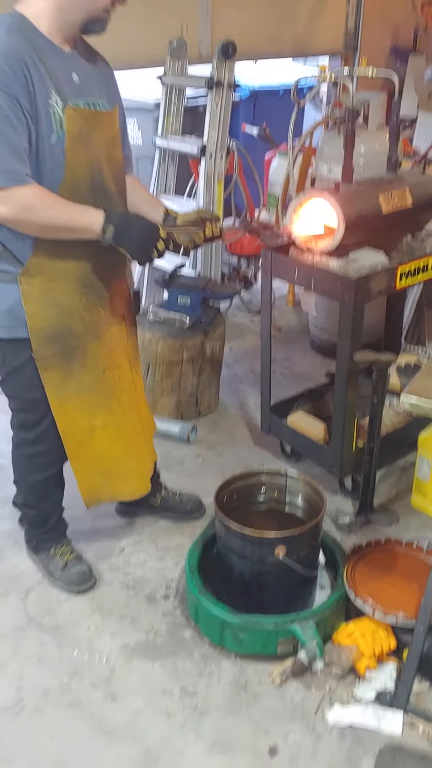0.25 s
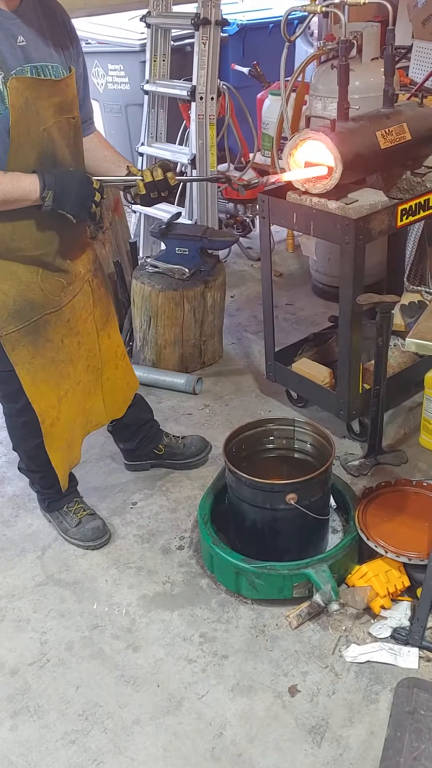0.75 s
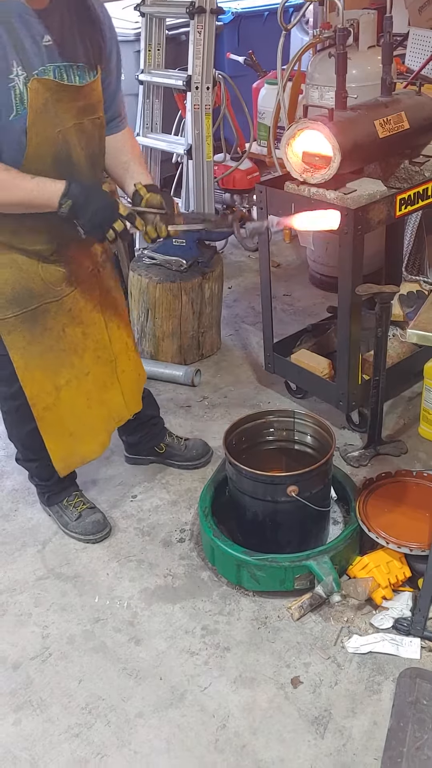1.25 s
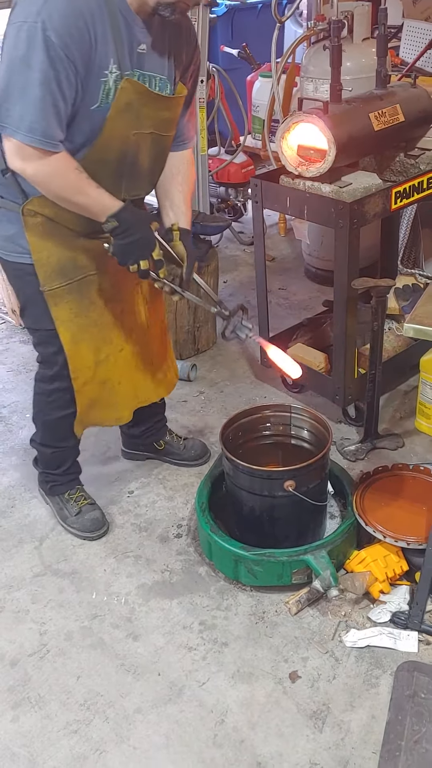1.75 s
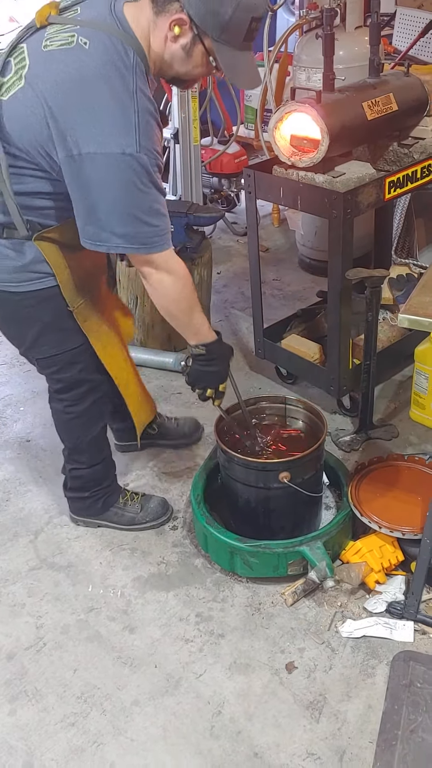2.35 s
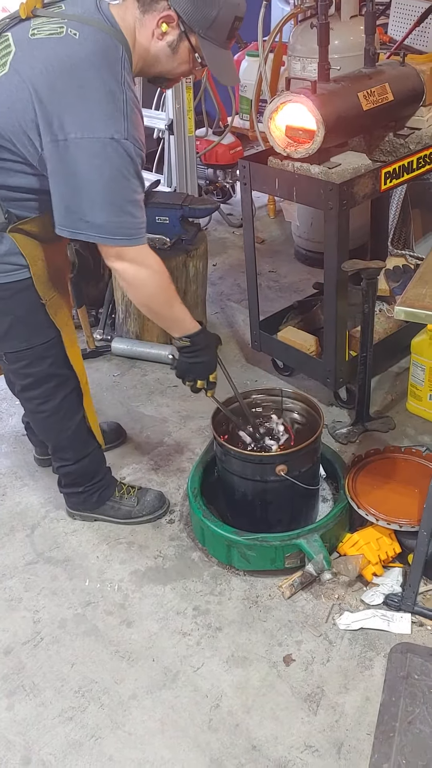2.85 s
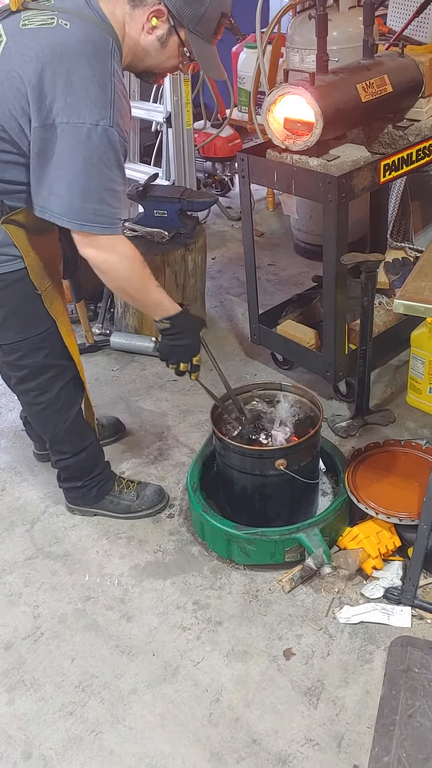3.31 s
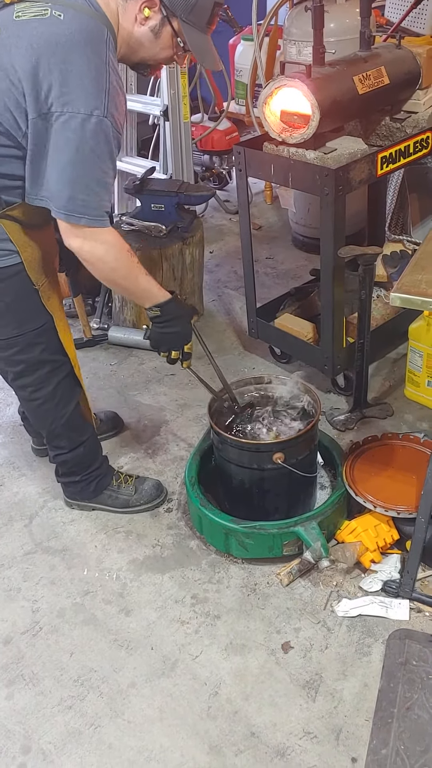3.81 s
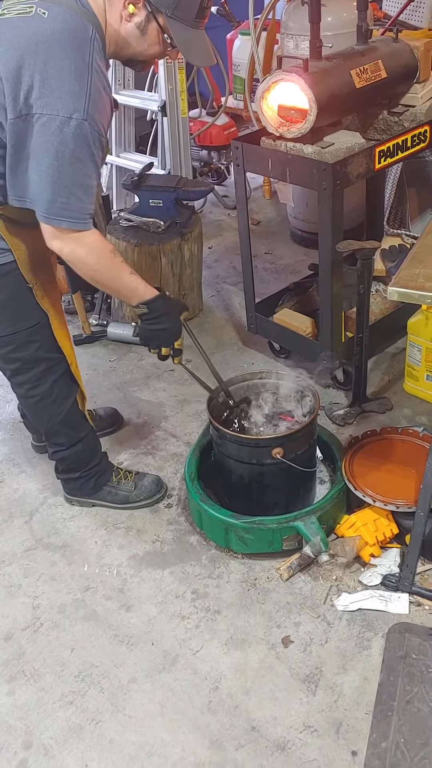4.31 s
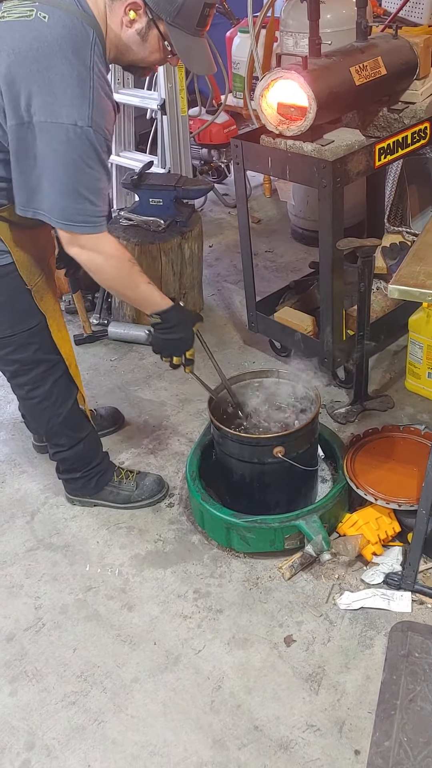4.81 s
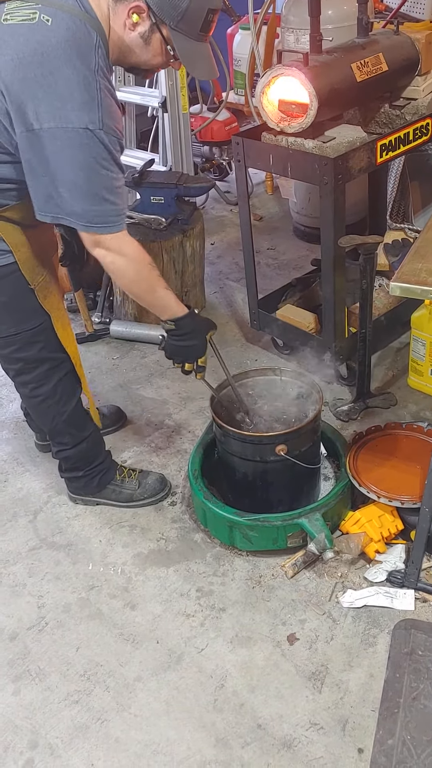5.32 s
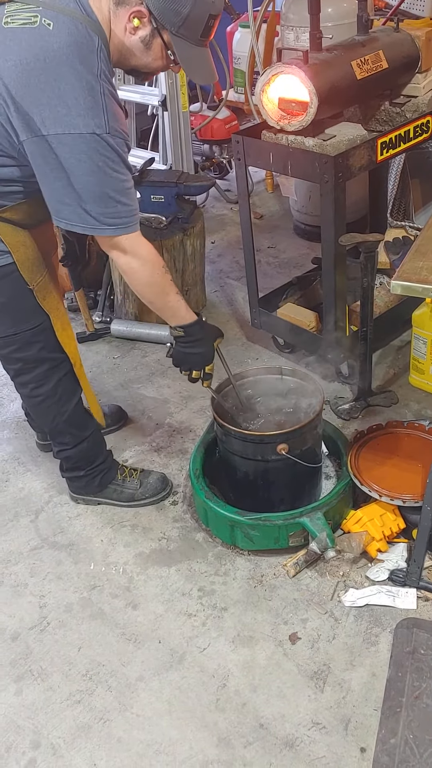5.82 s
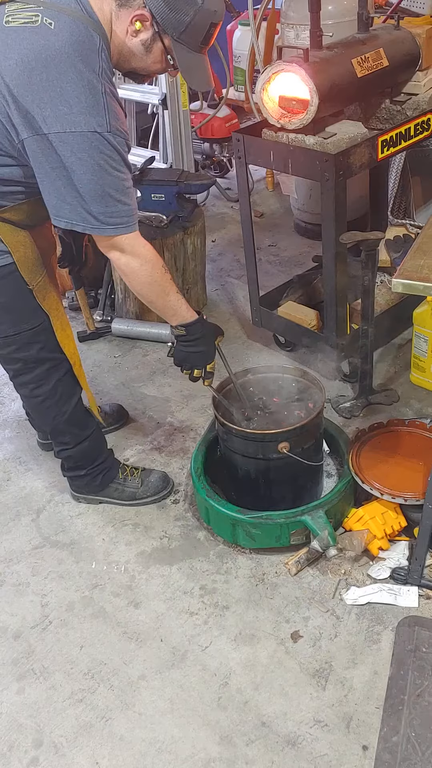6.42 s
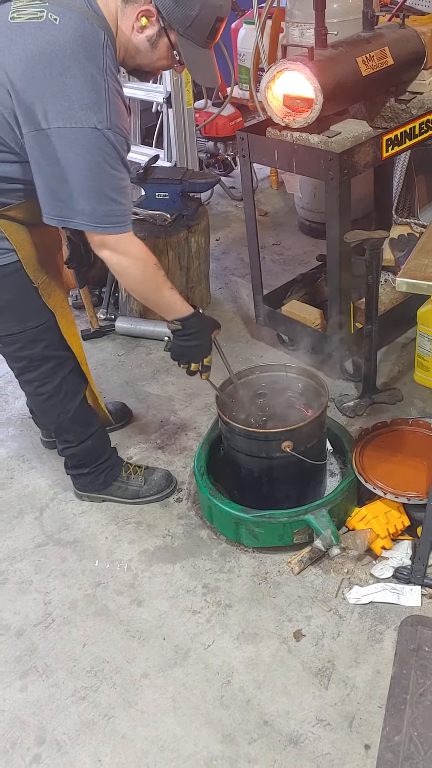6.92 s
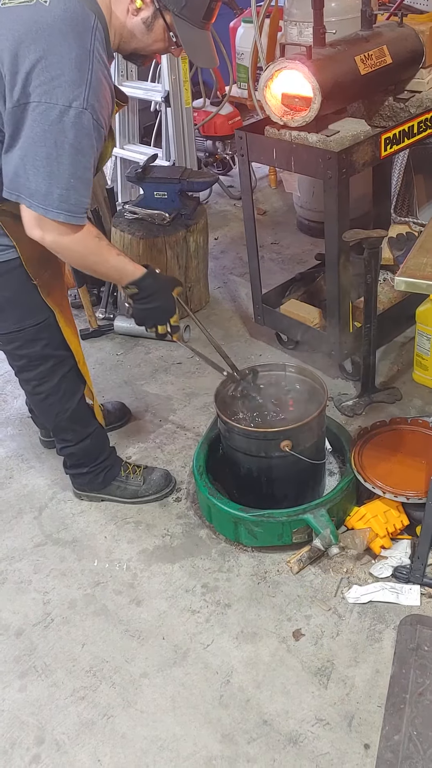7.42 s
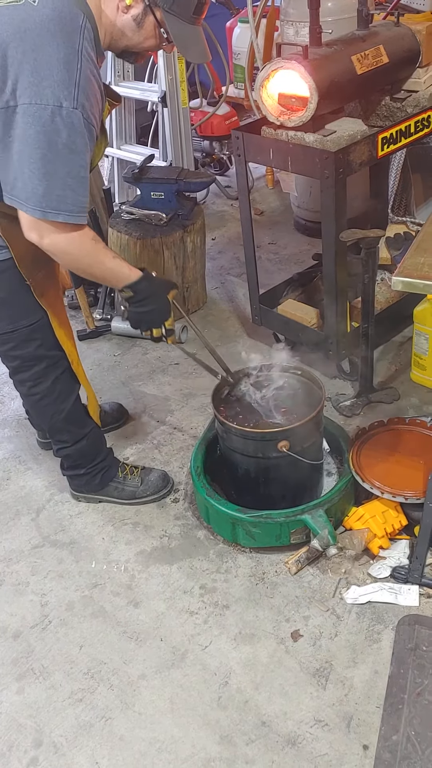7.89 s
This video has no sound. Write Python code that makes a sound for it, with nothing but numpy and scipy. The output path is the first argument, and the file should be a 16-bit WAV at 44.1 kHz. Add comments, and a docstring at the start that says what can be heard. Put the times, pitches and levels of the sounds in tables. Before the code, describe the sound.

Steady burner roar with loud, evenly spaced hammer blows weakening early on, followed by a brief oil quench sizzle, small metallic taps and a dull bump.

```python
"""Propane forge, hammer and oil quench

A propane forge burns steadily in a garage: a low roar, flow noise ringing in tube and room, under the jet's hiss.
Six sharp blows, like a hammer out of sight, are noise cracks with a hollow knock, a floor echo and a room tail.
A smith carries a hot blade from the forge to a bucket of oil: the oil splutters, spits and sizzles as noise bursts,
the tongs tap the rim and the blade bumps the wall, each a click with decaying modes.
A look-ahead limiter ducks the forge after each loud crack and lets it swell back."""
import sys
import numpy as np
from scipy import signal
from scipy.fft import rfft, irfft, next_fast_len
from scipy.io import wavfile
from scipy.ndimage import uniform_filter1d, minimum_filter1d

SR = 44100
rng = np.random.default_rng(int(sys.argv[2]) if len(sys.argv) > 2 else 0)


def generate_wav(sig):
    """Save sig (samples, or channels by samples) to the path in sys.argv[1] as 16-bit PCM at SR."""
    pcm = np.round(np.clip(np.atleast_2d(sig).T, -1, 1) * 32767).astype(np.int16)
    wavfile.write(sys.argv[1], SR, pcm)


N = 359415  # samples


def amp(db):
    """Level to amplitude: 20 dB is a factor of ten."""
    return 10 ** (np.asarray(db) / 20)


def unit(x):
    """Normalisation: scales a signal to rms 1."""
    return x / np.sqrt(np.mean(x ** 2) + 1e-20)


def read(points, hz):
    """Logarithmic frequency scale: joins (f/Hz, value) points by straight lines on it."""
    f, value = np.transpose(points)
    return np.interp(np.log(hz + 1), np.log(f + 1), value)


def follow(curve):
    """Envelope: joins (t/s, value) points into one value per sample."""
    return np.interp(np.arange(N) / SR, *np.transpose(curve))


def wander(count, size):
    """Low-passed chance: noise averaged over size samples, scaled to rms 1."""
    return unit(uniform_filter1d(rng.standard_normal(count), size=size))


def waver(depth_db, size):
    """Random amplitude modulation: a gain that wanders by depth_db rms."""
    return amp(depth_db * wander(N, size))


def swells(table):
    """Gaussian envelopes: a gain that rises and falls back around each (t/s, rise/dB, sigma/s)."""
    t = np.arange(N) / SR
    return amp(sum(db * np.exp(-((t - s) / sigma) ** 2 / 2) for s, db, sigma in table))


def sides(balance_db):
    """Level difference between the ears: left and right gains of constant total power."""
    pair = amp(np.array([balance_db, -balance_db]) / 2).reshape(2, -1)
    return pair / np.sqrt(np.mean(pair ** 2, 0))


def add(mix, s, sound):
    """Superposition: mixes a stereo sound in at time s."""
    part = mix[:, round(s * SR):][:, :sound.shape[1]]
    part += sound[:, :part.shape[1]]


def patchy(x, depth_db, size):
    """Time-frequency modulation: patches of size (bins, frames) swell and fade by chance."""
    z = signal.stft(x, nperseg=256)[2]
    patches = uniform_filter1d(rng.standard_normal(z.shape[1:]), size[0], axis=0)
    patches = unit(uniform_filter1d(patches, size[1], axis=1))
    return unit(signal.istft(z * amp(depth_db * patches))[1][:, :x.shape[1]])


def grainy(x, depth_db, size):
    """Granular modulation: breaks a noise into uneven grains about size samples long."""
    return unit(x * amp(depth_db * wander(x.shape[1], size)))


def steadied(x, size):
    """Envelope division: takes the slow swell out of a noise."""
    return x / np.sqrt(uniform_filter1d(np.mean(x ** 2, 0), size))


def drifting(x, share, size):
    """Sound speed in stirring hot gas: all resonances wander together by an rms share of their pitch."""
    speed = 1 + share * wander(N, size)
    place = np.cumsum(speed / speed.mean())
    return np.array([np.interp(place, np.arange(N), channel) for channel in x])


# likeness of the two microphones: f/Hz, likeness (negative values act as 0)
MICROPHONE_LIKENESS = [(60, 1), (290, 0.93), (450, 0.7), (700, 0.77), (1400, 0.13), (7000, 0.26),
                       (15000, -0.36)]
# broadband stereo balance: f/Hz, left minus right level/dB
FLOW_BALANCE = [(60, 2.5), (380, -13), (700, 13), (1200, -6.5), (2400, 0.5), (4400, -4.5), (8000, -8),
                (15000, -1)]


def turbulence(spectrum, modes, ripple_db, lag_s=.00018):
    """Turbulent flow noise: a broad spectrum with resonances, partly coherent at two microphones."""
    hz = np.fft.rfftfreq(next_fast_len(N, True), 1 / SR)
    power = (amp(read(spectrum, hz)) * sides(read(FLOW_BALANCE, hz))) ** 2
    for centre, width, db, balance_db in modes:
        resonance = amp(db) * sides(balance_db) / (1 + ((hz - centre) / width) ** 2)
        power = power + resonance ** 2
    # wall reflections comb each microphone differently
    comb = unit(uniform_filter1d(rng.standard_normal((2, len(hz))), size=200, axis=1))
    left, other = rng.standard_normal((2, len(hz))) + 1j * rng.standard_normal((2, len(hz)))
    same = np.clip(read(MICROPHONE_LIKENESS, hz), 0, 1)
    right = same * left + np.sqrt(1 - same ** 2) * other
    right = right * np.exp(-2j * np.pi * hz * lag_s)  # arrives later by lag_s
    return unit(irfft(np.array([left, right]) * np.sqrt(power) * amp(ripple_db * comb))[:, :N])


# impact tables below share these columns: t/s, crack level/dB, crack sigma/s, brightness/(dB per octave),
# knock f/Hz, knock level/dB over the crack spectrum, room level/dB; some add clang f/Hz, clang level/dB
# spectrum of a hard impact: f/Hz, level/dB
CRACK_SPECTRUM = [(150, -36), (600, -35), (1500, -13), (3700, -3), (5500, -1.5), (6600, -1.5), (7500, 1.5),
                  (8100, -2), (8800, -8), (10000, -13.5), (11500, -15), (12400, -23), (16000, -31)]
# spectrum of the hollow knock: multiple of its pitch, level/dB
KNOCK_SPECTRUM = [(.12, -43), (.3, -2), (.52, 2.5), (.8, 2.5), (1, 7), (1.22, 2), (1.42, -9), (2.2, -33),
                  (5, -50)]
# decay of the garage: f/Hz, t60/s
GARAGE_DECAY = [(300, 0.076), (2500, 0.33), (7000, 0.26), (12000, 0.19)]
# colouring of the reflected sound by the walls: f/Hz, level/dB
WALL_COLOUR = [(500, 4), (3000, -4.5), (11500, 3), (12800, -4), (16000, -15)]


def impact(db, length, tilt_db, knock_hz, knock_db, room_db, clang_hz=5000, clang_db=0, echo_db=-10):
    """Impulse excitation: a short crack with knock and clang, its floor bounce, and the ring of the garage."""
    size, echo_s, build_s, clang_width_hz = 2 ** 15, 0.0058, 0.01, 400
    t, hz = np.arange(size) / SR, np.fft.rfftfreq(size, 1 / SR)
    knock_shape_db = read(np.multiply(KNOCK_SPECTRUM, [knock_hz, 1]), hz)
    knock = amp(knock_db + read(CRACK_SPECTRUM, knock_hz) + knock_shape_db)
    clang = amp(clang_db / (1 + ((hz - clang_hz) / clang_width_hz) ** 2))
    colour = np.hypot(amp(read(CRACK_SPECTRUM, hz)), knock) * clang
    colour = colour * amp(tilt_db * np.log2(hz + 1000))
    burst, wash = (unit(irfft(colour * rfft(rng.standard_normal((2, size))))) for _ in range(2))

    burst = burst + 0.27 * burst[::-1]  # the direct sound is partly alike at both microphones
    onset = np.minimum(t * knock_hz * 2, 1)  # a deeper knock starts more softly
    shape = np.exp(-(t / length) ** 2 / 2) * onset
    crack = unit(burst * shape) * np.sqrt(np.mean(shape ** 2))
    echo = amp(echo_db) * np.roll(crack, round(echo_s * SR), axis=1)

    # reflections arrive singly and in clumps
    wash = grainy(patchy(wash, depth_db=1.2, size=(5, 6)), depth_db=1.0, size=36)
    f, when, z = signal.stft(wash, SR, nperseg=256)
    fade_db = read(WALL_COLOUR, f)[:, None] - 60 * when / read(GARAGE_DECAY, f)[:, None]
    tail = signal.istft(z * amp(fade_db), SR)[1][:, :size]
    tail = tail * (1 - np.exp(-(t / build_s) ** 2))
    return amp(db) * sides(balance_db=-2.5) * (crack + echo + amp(room_db) * tail)


def impacts(table):
    """Superposition of impulses: plays every row of a table of impacts."""
    out = np.zeros((2, N))
    for s, *row in table:
        add(out, s, impact(*row))
    return out


def ring(modes, spacing_s=.0001):
    """Modal decay of a struck body; each mode reaches each microphone with its own small random lead."""
    t = np.arange(SR // 4) / SR
    tones = np.zeros((2, len(t)))
    for hz, db, t60 in modes:
        shifted = t + spacing_s * rng.random((2, 1))
        tones += amp(db - 60 * t / t60) * np.sin(2 * np.pi * hz * shifted)
    return tones * np.minimum(t / .0003, 1)  # soft start


# slow drift of the roar: t/s, level/dB
ROAR_DRIFT = [(0, -17.5), (0.55, -14.5), (1.15, -14), (1.7, -15), (2.68, -17), (2.88, -16), (3.3, -17.0),
              (4.4, -17.0), (4.85, -19.0), (5.55, -17.0), (6.1, -19.5), (6.6, -16.5), (6.95, -19.5),
              (7.45, -17.0), (8.15, -18)]
# brief low surges: t/s, rise/dB, sigma/s; the one at 6.81 s is the bucket booming as the tongs knock it
LOW_SURGES = [(1.313, 1, 0.0055), (2.262, 5, 0.021), (6.81, 9, 0.011)]
# smooth spectrum of the roar: f/Hz, relative level/dB
ROAR_SPECTRUM = [(20, -88), (40, -78), (70, -61.5), (100, -56), (140, -52), (200, -49.5), (235, -78),
                 (300, -54), (410, -58), (480, -59.5), (540, -81), (800, -110)]
# resonances of forge tube and room: f/Hz, half-width/Hz, relative peak level/dB, left minus right level/dB
ROAR_RESONANCES = [(59, 5.8, -56.5, -7), (94.7, 7.4, -51.5, 0), (112, 10, -75, 9), (155.2, 13.7, -48.5, 8),
                   (189, 17.3, -47, -4), (207.7, 4.3, -40, 6.5), (266.5, 7.2, -34.5, -3.5),
                   (276, 27, -41.5, 0), (303, 19.7, -41, -1.5), (339, 18, -43.5, -3), (347, 18, -49.5, -34),
                   (393.6, 15.1, -34.5, -3.5), (423.8, 6.7, -43.5, -2), (464, 7.6, -50.5, 3)]


def flame():
    """Combustion noise in a resonant tube: a steady roar with a slow drift, lifted by a few brief low surges,
    one of them a boom of the bucket."""
    roar = turbulence(ROAR_SPECTRUM, ROAR_RESONANCES, ripple_db=0.0, lag_s=.00003)
    roar = drifting(steadied(roar, size=11000), share=0.00886, size=6000)
    return roar * amp(follow(ROAR_DRIFT)) * swells(LOW_SURGES)


# moments when one forge resonance stands out: t/s, sigma/s, f/Hz, half-width/Hz, level/dB
RESONANCE_FLARES = [(0.48, 0.037, 1030, 21, -28.5), (1.24, 0.082, 970, 99, -35),
                    (2.97, 0.02, 1010, 49, -29), (4.25, 0.041, 51.3, 9, -34)]


def flares():
    """Resonant excitation: the flame drives one mode harder, a short fuzzy whistle or a low puff."""
    t, hz = np.arange(N) / SR, np.fft.rfftfreq(next_fast_len(N, True), 1 / SR)
    out = np.zeros((1, N))
    for s, sigma, centre, width, db in RESONANCE_FLARES:
        random_phase = np.exp(2j * np.pi * rng.random((1, len(hz))))
        band = irfft(random_phase / (1 + ((hz - centre) / width) ** 4))[:, :N]
        out += amp(db) * steadied(band, size=4000) * np.exp(-((t - s) / sigma) ** 2 / 2)
    return sides(balance_db=-3.0) * out


# the smith's move, which changes the reflections: t/s, share of the way from forge mouth to bucket
SMITH_WALK = [(.6, 0.43), (1.8, 0.74), (3.2, 0.9), (5.5, 1)]
# smooth spectra of the rush and of the hiss: f/Hz, relative level/dB
RUSH_SPECTRUM = [(350, -106), (500, -63.5), (660, -62.5), (1000, -68.5), (1250, -63.5), (1430, -74),
                 (1620, -65), (1830, -66.5), (2150, -74), (3000, -105)]
HISS_SPECTRUM = [(1500, -100), (2300, -70.5), (3050, -70), (3400, -73.5), (4400, -71.5), (5600, -72),
                 (6700, -60.5), (7200, -64), (7650, -59.5), (8200, -62), (8700, -70.5), (11400, -78.5),
                 (13000, -84), (15500, -99)]
# resonances of the rush with the smith at the bucket, of the rush with him at the forge, and of the hiss:
# f/Hz, half-width/Hz, relative peak level/dB, left minus right level/dB
RUSH_AT_BUCKET = [(509, 16, -61, 6), (580.4, 19.6, -52.5, 5), (615, 15, -66, 5), (717, 5, -51.5, -5),
                  (774, 8, -50, 6), (831, 15.3, -54.5, 0), (856, 43, -58.5, -4), (921.5, 18, -51.5, -10),
                  (981, 29, -53, -28), (1020, 4.5, -51, 1), (1047, 15.5, -56, 0), (1130, 7.4, -60, 13)]
RUSH_AT_FORGE = [(735, 16, -69, 11), (844, 14, -55, -16), (867, 21, -51.5, -9), (980, 90, -56, -1.5),
                 (1132, 52, -57, -26), (1360, 35, -63, -4), (1615, 54, -59, -20), (1780, 4, -65, -25)]
HISS_RESONANCES = [(2900, 12, -79, 1), (3063, 33, -65, -18), (3190, 33, -68, -10), (6126, 36, -60.5, -24),
                   (6770, 36, -58, -40), (7410, 27, -60, 18)]
# brief swells of the hiss, mostly just ahead of a blow: t/s, rise/dB, sigma/s
BRIEF_HISS_SWELLS = [(0.025, 4.5, 0.038), (0.145, 5.5, 0.02), (0.757, 4.5, 0.018), (1.305, 5, 0.031),
                     (1.892, 8, 0.03), (2.455, 3.5, 0.015), (2.968, 4.5, 0.015), (7.07, 2, 0.063)]


def jet(bucket_db=-29.0, forge_db=-25.5, hiss_db=-30, hiss_forge_rise_db=3.9, flutter_db=0.76):
    """Jet noise: rush at the forge mouth and hiss flutter together and change as the smith moves."""
    way = np.clip(follow(SMITH_WALK), 0, 1)
    # equal-power crossfade between the two sets of resonances
    rush = np.sqrt(way) * turbulence(RUSH_SPECTRUM, RUSH_AT_BUCKET, ripple_db=2.5) * amp(bucket_db)
    rush += np.sqrt(1 - way) * turbulence(RUSH_SPECTRUM, RUSH_AT_FORGE, ripple_db=5.0) * amp(forge_db)
    rush = drifting(rush, share=0.00815, size=5000)
    hiss = turbulence(HISS_SPECTRUM, HISS_RESONANCES, ripple_db=3.0)
    hiss = patchy(hiss, depth_db=1.56, size=(4, 22))
    hiss = hiss * amp(hiss_db + hiss_forge_rise_db * (1 - way))
    hiss = hiss * swells(BRIEF_HISS_SWELLS) * waver(depth_db=0.2, size=6000)
    return waver(flutter_db, size=1300) * (rush + hiss)


def sizzle(start_s=2.05, per_s=14, pop_db=-33):
    """Poisson-like bubble bursts on the oil, one pop at random times and strengths, once the blade is in."""
    pops = (rng.random(N) < per_s / SR) * rng.uniform(0.32, 2.4, N)  # pop_db is before this factor
    pops = pops * (np.arange(N) / SR > start_s)
    pop = impact(pop_db, length=0.0009, tilt_db=9, knock_hz=3060, knock_db=-5, room_db=-2.5)
    return signal.oaconvolve(pops[None], pop, axes=1)[:, :N]


# spectrum of the splutter at its peak: f/Hz, relative level/dB
SPLUTTER_SPECTRUM = [(400, -20), (800, 0), (1600, -1), (2600, -5), (3900, -11), (5500, -4), (6400, -11),
                     (7500, 0), (9500, -15), (14000, -31)]


def splutter(peak_s=2.595, db=-18, rise_s=0.12, fall_s=0.041, darkening=39):
    """Vapour breaking through oil: a grainy hiss darkens by dB per octave per second, swells and dies."""
    hz, when, z = signal.stft(rng.standard_normal((2, N)), SR, nperseg=256)
    since = np.clip(when - peak_s, -rise_s, fall_s)
    tilt_db = darkening * since * np.log2(hz + 1000)[:, None]
    colour = amp(read(SPLUTTER_SPECTRUM, hz)[:, None] - tilt_db)
    hiss = signal.istft(z * colour / np.linalg.norm(colour, axis=0))[1][:, :N]
    t = np.arange(N) / SR - peak_s
    swell = np.exp(-np.where(t < 0, (t / rise_s) ** 2, t / fall_s))
    return amp(db) * sides(balance_db=-3.0) * swell * grainy(hiss, depth_db=1.2, size=110)


# spits of oil: impact columns without the clang
OIL_SPITS = [(2.049, -20, 0.0022, 1, 7550, 7, -14), (2.0955, -21.5, 0.001, 2, 7550, 7, -18),
             (2.2359, -19, 0.001, 1, 7400, 9, -18), (2.3676, -18, 0.001, 2, 7550, 9, -18),
             (3.4731, -16, 0.00058, 6, 7000, 7, -9), (4.0283, -20, 0.0011, 3, 3000, -4, -11),
             (4.6005, -21, .001, 5, 2800, 6, -7)]


def spits():
    """Droplet impulses: single spits of oil, each a small bright crack."""
    return impacts(OIL_SPITS)


# taps on the bucket's rim: t/s, click level/dB, click sigma/s, brightness/(dB per octave),
# ring level/dB, favoured f/Hz
RIM_TAPS = [(6.754, -12, 0.0005, 5, -11, 8200), (6.793, -9, 0.0004, 11, -16, 3600),
            (6.858, -21, 0.0012, 4, -14, 6000)]
# modes of the tongs, damped by the glove: f/Hz, level/dB, t60/s
TONGS_MODES = [(1900, -4, .012), (2500, -6, .012), (3020, -4, .015), (4520, -7, .014), (5560, -5, .025),
               (6470, -9, .02), (7900, 2, .014), (10150, -3, .01), (11600, -6, .01)]


def tongs(favour_db=5):
    """Modal excitation: the place of contact favours some modes, others lose favour_db an octave away."""
    out = np.zeros((2, N))
    for s, click_db, length, tilt_db, ring_db, best_hz in RIM_TAPS:
        click = impact(click_db, length, tilt_db, knock_hz=2400, knock_db=13, room_db=-20, echo_db=-17)
        add(out, s, click)
        modes = [(hz, db - favour_db * abs(np.log2(hz / best_hz)), t60) for hz, db, t60 in TONGS_MODES]
        add(out, s, amp(ring_db) * sides(balance_db=-6.0) * ring(modes))
    return out


# modes of the full bucket, damped by the oil: f/Hz, level/dB, t60/s
BUCKET_MODES = [(340, -2, .03), (620, 2, .035), (880, 0, .025), (1230, -5, .03), (1740, -14, .1),
                (2350, 10, .006), (2560, -13, .035), (4300, -11, .006)]


def bump(at_s=7.9123, click_db=-13.5, ring_db=-15):
    """Damped modal ringing: the blade bumps the bucket, a dull knock and the short ring of its wall."""
    out = np.zeros((2, N))
    click = impact(click_db, length=0.0009, tilt_db=-5, knock_hz=2400, knock_db=16, room_db=-16, echo_db=-12)
    add(out, at_s, click)
    add(out, at_s, amp(ring_db) * sides(balance_db=9.0) * ring(BUCKET_MODES))
    return out


# the hammer bounces and clicks again: impact columns without the clang
HAMMER_REBOUNDS = [(0.7868, 0, 0.0022, 6, 3000, -8, -16), (2.4815, -4, 0.0014, 7, 3000, -8, -16),
                   (2.9805, -5, 0.0018, 5, 3200, 0, -14)]


def rebounds():
    """Elastic rebound: the hammer bounces and clicks again after some blows."""
    return impacts(HAMMER_REBOUNDS)


# hammer blows: impact columns with the clang
HAMMER_BLOWS = [(0.1518, 21, 0.0015, 5.5, 3300, -17, -12, 7000, 5),
                (0.7640, 10.5, 0.0023, 2.5, 2520, 2, -2.5, 6750, 3.5),
                (1.3258, 14, 0.0018, 3, 2810, 10, -4, 3080, 1.5),
                (1.9058, 13.5, 0.0011, -0.5, 2440, 4.5, -7, 4440, 2),
                (2.462, 3, 0.0021, 3.5, 2230, 2.5, -3, 5340, 3.5),
                (2.9745, -2, 0.0027, 7, 3200, -4, -9, 4800, 3)]


def blows():
    """Hard collision: six hammer blows, each crack, knock and clang ringing in the garage."""
    return impacts(HAMMER_BLOWS)


def scene():
    """Superposition of forge, quench and hammer."""
    forge = flame() + flares() + jet()
    quench = sizzle() + splutter() + spits() + tongs() + bump()
    return forge + quench + rebounds() + blows()


def record(dry, recover_db_per_s=135, threshold_db=-5, treble_db=-3, deepest_db=18.0,
           linger_share=0.66, linger_s=0.18):
    """Look-ahead limiting, keenest on treble, with fast then slow recovery; then overload and band limit."""
    t = np.arange(N) / SR
    treble = signal.sosfilt(signal.butter(1, 1500, "high", fs=SR, output="sos"), dry)
    power = uniform_filter1d(((dry + amp(treble_db) * treble) ** 2).mean(0), size=56)
    over_db = np.clip(10 * np.log10(abs(power) + 1e-12) - threshold_db, 0, deepest_db)
    fall, fade = t * recover_db_per_s, np.exp(-t / linger_s)
    quick_db = np.maximum.accumulate(over_db + fall) - fall
    slow_db = linger_share * np.maximum.accumulate(over_db / fade) * fade
    gain = amp(-np.maximum(quick_db, slow_db))
    # centred windows let the gain drop ahead of the peak
    gain = uniform_filter1d(minimum_filter1d(gain, size=48), size=48)
    overloaded = np.clip(dry * gain, -.9, .9)
    lowpass = signal.firwin(255, 16200, window=("kaiser", 9), fs=SR)  # cutoff in Hz
    return signal.oaconvolve(overloaded, lowpass[None], "same")


dry = scene()
out = record(dry)
generate_wav(out)
```